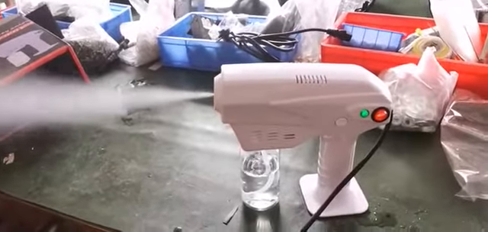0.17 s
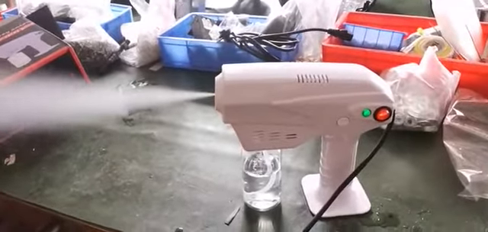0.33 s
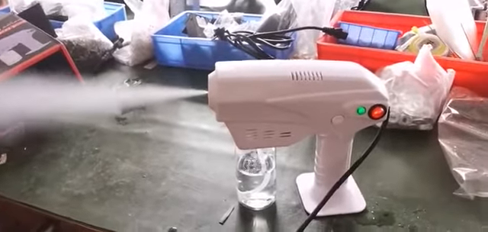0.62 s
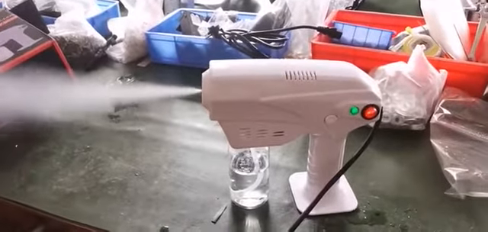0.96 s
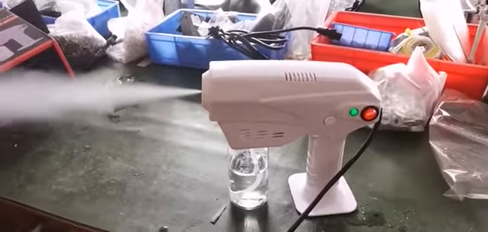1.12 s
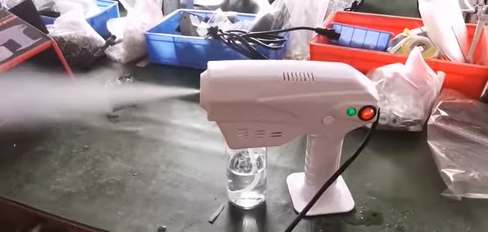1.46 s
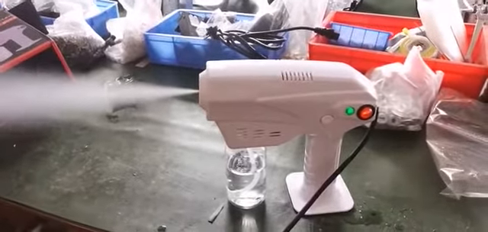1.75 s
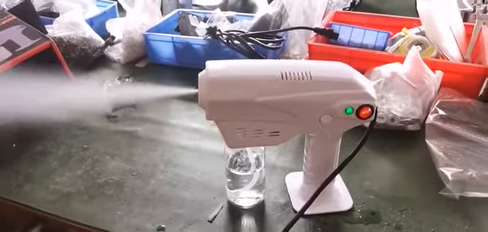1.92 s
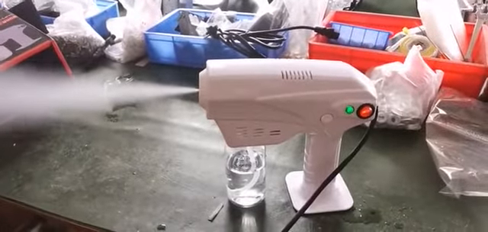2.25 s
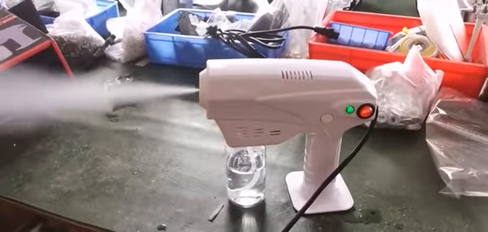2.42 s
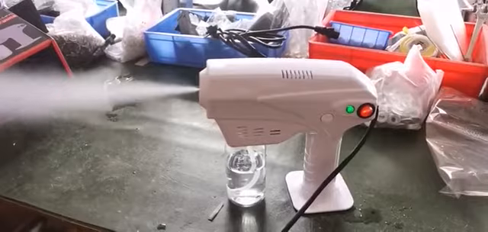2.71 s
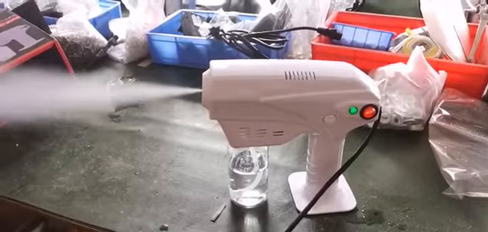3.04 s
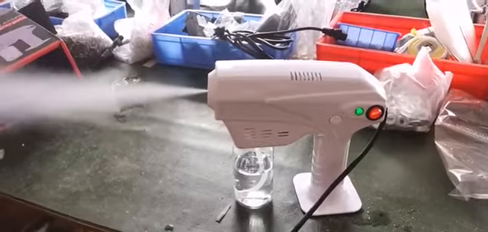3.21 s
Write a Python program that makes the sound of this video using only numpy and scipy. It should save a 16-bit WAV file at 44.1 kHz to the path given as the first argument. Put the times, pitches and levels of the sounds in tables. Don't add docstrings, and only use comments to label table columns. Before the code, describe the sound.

Mist hisses continuously from a spray gun, spitting slightly, with dragging, bumping and soft footsteps behind.

```python
import sys
import numpy as np
from scipy import signal
from scipy.fft import rfft, irfft
from scipy.io import wavfile
from scipy.ndimage import uniform_filter1d, minimum_filter1d

SR = 44100
rng = np.random.default_rng(int(sys.argv[2]) if len(sys.argv) > 2 else 0)


def master_out(mix):
    frames = np.transpose(np.atleast_2d(mix))
    ceiling = np.clip(frames, -1, 1)
    pcm = np.round(ceiling * 32767).astype(np.int16)
    wavfile.write(sys.argv[1], SR, pcm)


N = 148617
T = np.arange(N) / SR
F = np.maximum(np.fft.rfftfreq(N, 1 / SR), 1)

# (frequency [Hz], density [dB per Hz])
JET_COLOUR = [(290, -68), (500, -40.5), (780, -18), (1270, -25), (1630, -14.5), (1810, -13), (3630, -8.5),
              (5530, -3.5), (7600, 1.5), (9880, -39), (16700, -120)]
NOZZLE_HZ = [4320, 4640, 5020, 5385, 5760, 6100, 6580, 6960, 7200, 7420, 2600, 5200, 6320, 7530]
# (width [Hz], lift [dB])
NOZZLE_SHAPE = [(171, 5), (170, 5), (190, 8), (196, 9.5), (234, 10), (168, 3), (170, 2.5), (133, 0),
                (140, 2.5), (179, 4.5), (905, 2), (120, -1), (202, -1), (91.2, 1)]
# (time [s], level [dB])
FLOW = [(0, -45), (0.201, -43.5), (.45, -44.5), (.6, -43), (0.701, -43.5), (0.759, -46), (.95, -44),
        (1.05, -43.5), (1.22, -43.5), (1.349, -44.5), (1.701, -44), (2.4, -44), (2.6, -45), (2.731, -43.5),
        (2.82, -45), (3.0, -44.5), (3.2, -44), (3.37, -45)]
# (peak time [s], lift [dB])
SLUGS = [(0.063, 5.7), (0.194, 5.7), (0.593, 6.2), (0.792, 5.0), (0.826, 5.5), (1.014, 7.1), (1.09, 6.3),
         (1.213, 5.1), (1.468, 5.7), (1.532, 5.2), (1.588, 5.6), (1.691, 5.0), (1.72, 6.3), (1.774, 5.4),
         (1.944, 5.3), (2.037, 5.7), (2.101, 5.1), (2.378, 5.5), (2.438, 6.3), (2.532, 6.0), (2.679, 5.5),
         (2.705, 5.0), (2.919, 5.7), (3.0, 6.1), (3.026, 7.5), (3.096, 5.0), (3.149, 6.2), (3.223, 5.3),
         (3.297, 5.0)]
# (peak time [s], lift [dB])
SPITS = [(0.111, 4.5), (0.136, 4.7), (0.241, 3.7), (0.306, 4.9), (0.408, 4.3), (0.487, 3.7), (0.526, 3.7),
         (0.644, 4.7), (0.687, 4.2), (0.862, 4.4), (1.155, 4.5), (1.265, 4.1), (1.337, 3.8), (1.376, 4.5),
         (1.41, 4.5), (1.803, 4.6), (1.857, 4.8), (2.141, 4.3), (2.169, 4.9), (2.211, 4.4), (2.237, 4.7),
         (2.33, 3.7), (2.566, 3.8), (2.641, 3.9), (2.758, 4.1), (2.825, 3.9), (2.857, 4.3), (2.96, 4.4),
         (3.327, 4.8)]
# (time [s], lift [dB])
POPS = [(0.578, 4), (0.643, 4), (0.953, 3), (1.012, 3), (1.089, 6), (1.213, 3), (1.266, 3), (1.72, 5),
        (1.756, 4), (1.802, 4), (2.036, 3), (2.357, 4), (2.437, 3), (2.705, 3), (2.79, 3), (2.92, 4),
        (2.998, 7), (3.027, 3), (3.097, 5), (3.147, 2.5)]
# (frequency [Hz], share [1])
SPUTTER_SHARE = [(1000, 1.8), (2500, 0.31), (5000, 0.99), (7500, 0.12)]

# (time [s], scrape level [dB], boom level [dB])
DRAGS = [
    [(.1, -77, -71.5), (.2, -56, -54), (.3, -50, -57.5), (.42, -51.5, -60), (.55, -53, -53),
     (.7, -52.5, -63), (.8, -56, -60), (.88, -57.5, -60)],
    [(.97, -54.5, -64), (1.1, -51, -60.5), (1.26, -51, -55), (1.36, -51, -52.5), (1.42, -56.5, -56),
     (1.52, -62.5, -90)],
]
# (frequency [Hz], density [dB per Hz])
SCRAPE_COLOUR = [(150, -39), (250, -11.5), (276, -23), (346, -12.5), (892, -13.5), (1130, -9.5),
                 (1590, -10), (2080, -9), (3600, -10.5), (4680, -17), (7920, -120)]
# (centre [Hz], width [Hz], lift [dB])
SCRAPE_RING = [(1315, 98, 3.5), (1540, 90, 2), (2200, 530, 4.5), (350, 54, 3.5)]
# (time [s], peak level [dB], pitch [Hz])
BUMPS = [(0.051, -53, 111.6), (0.206, -53, 122.5), (0.255, -49, 120), (0.331, -43.5, 128), (0.39, -48, 124),
         (0.463, -47.5, 96.6), (0.491, -41.5, 108), (0.567, -38, 108), (0.631, -48, 96), (0.713, -45, 103),
         (0.8, -48, 95), (0.972, -47.5, 99), (1.031, -46, 104), (1.09, -46, 140), (1.139, -43, 100),
         (1.199, -44, 111), (1.249, -50, 116), (1.328, -36, 108), (1.795, -61, 152), (1.946, -53.5, 111),
         (1.995, -44, 102.3), (2.039, -51.5, 155), (2.081, -56, 187)]
# (ratio to pitch [1], level [dB], 60 dB decay time [s])
BUMP_MODES = [(1.001, -3.5, 0.13), (1.24, -12.5, 0.15), (2.3, -17, .08), (3.4, -15, 0.082)]
# (time [s], centre [Hz])
SQUEAL_PITCH = [(0.2, 2280), (0.3, 2200), (0.36, 2255), (0.45, 2120), (0.55, 2083), (0.72, 2164),
                (0.78, 2227), (0.826, 2072), (1.1, 2008), (1.18, 2047), (1.23, 2130), (1.29, 2200),
                (1.33, 2083), (1.42, 2140), (1.5, 2200)]
# (time [s], lift [dB])
BITES = [
    (.3, 3),
    (.33, 4.5),
    (.46, 10.5),
    (1.124, 7),
    (1.18, 8.5),
    (1.225, 3.5),
    (1.28, 3.5),
    (1.325, 1),
]

# (peak time [s], level [dB], rise [s], fall [s])
STEPS = [
    (2.66, -63, 0.042, 0.027),
    (2.7, -53, 0.025, 0.047),
    (2.755, -57.5, 0.024, 0.028),
    (2.935, -58.5, .025, 0.015),
    (2.99, -58, 0.015, 0.053),
    (3.1, -64, 0.017, 0.018),
    (3.19, -58, 0.03, 0.045),
    (3.26, -58.5, .04, .05),
    (3.31, -51.5, 0.036, 0.044),
    (3.355, -50, .03, 0.11),
]
# (frequency [Hz], density [dB per Hz])
STEP_COLOUR = [(24, -46.5), (40, -3.5), (230, 1.5), (348, 1), (456, -2.5), (589, -14), (783, -14),
               (890, -8.5), (1200, -22.5), (1560, -41), (2640, -120)]
# (frequency [Hz], density [dB per Hz])
SHOP_COLOUR = [(12, -38), (20, -4), (43, -2.5), (75, -3.5), (146, 1), (317, -5), (380, -3), (576, -6.5),
               (1500, -6.5), (1950, -41), (3300, -120)]
# (time [s], level [dB])
SHOP_SWELL = [(0, 0), (.18, -1.5), (.3, 1), (1.4, 0.5), (1.55, -0.5), (1.75, 0), (2.2, 0), (2.9, 1),
              (3.37, 0.5)]

# (frequency [Hz], threshold [dB])
DROPOUT = [(1200, -8), (1900, -4.5), (2600, -4.8), (3000, -2.5), (3450, -1.1), (3950, -1.6), (4250, -7),
           (7600, -11)]
# (time [s], low edge [Hz], high edge [Hz])
FILLS = [(.265, 5150, 6900), (.36, 6900, 7580), (1.333, 4650, 5150), (1.498, 6250, 6900),
         (1.662, 4150, 4650), (1.848, 6900, 7580), (2.355, 4650, 5150), (2.82, 5650, 6900),
         (3.077, 4150, 4650), (3.1, 6250, 6900), (3.147, 4650, 5150), (3.193, 5150, 5650)]


def undb(db):
    return 10 ** (np.asarray(db) / 20)


def unit(x):
    return x / np.sqrt(np.mean(x ** 2))


def follow(table):
    return np.interp(T, *np.array(table).T)


def colour(points, peaks=()):
    hz, db = np.array(points, float).T
    db = np.interp(np.log(F), np.log(hz), db, left=-60, right=-60)
    lift = sum(g / (1 + (2 * (F - centre) / width) ** 2) for centre, width, g in peaks)
    return undb(db + lift)


def hiss(gain):
    return irfft(rfft(rng.standard_normal(N)) * gain, N)


def walk(rate_hz):
    hold = max(int(SR / rate_hz), 1)
    levels = rng.standard_normal(N)[np.arange(N) // hold]
    return unit(uniform_filter1d(uniform_filter1d(levels, hold), hold))


def flutter(rate_hz):
    w = walk(rate_hz)
    return w - uniform_filter1d(w, SR // 8)


def hump(at, rise, fall):
    d = T - at
    return np.where(d < 0, np.exp(-(d / rise) ** 2), np.exp(-np.maximum(d, 0) / fall))


def sputter():
    slugs = sum(hump(s, 0.008, 0.010) * 0.95 * db for s, db in list(SLUGS) + list(SPITS))
    pops = sum(hump(s, 0.0015, 0.0025) * 1.1 * db for s, db in POPS)
    slugs = slugs - uniform_filter1d(slugs, SR // 5)
    return pops + slugs + 0.4 * flutter(90) + 1.7 * walk(401)


def jet():
    flicker_hz, flicker_db, trim_db = 40, 1.2, 1
    swell = sputter()
    peaks = [(hz, max(width, 90), db) for hz, (width, db) in zip(NOZZLE_HZ, NOZZLE_SHAPE)]
    gain = colour(JET_COLOUR, peaks)
    out = 0
    for hz in 8000 * 2 ** -np.arange(0, 4.5, 1 / 3):
        band = np.cos(np.pi / 2 * np.clip(3 * np.log2(F / hz), -1, 1))
        share = np.interp(hz, *np.array(SPUTTER_SHARE).T)
        out = out + hiss(gain * band) * undb(share * swell + flicker_db * flutter(flicker_hz))
    return unit(out) * undb(follow(FLOW) + trim_db)


def drag_effort(column):
    d = np.vstack(DRAGS)
    return undb(np.interp(T, d[:, 0], d[:, column], left=-99, right=-99))


def crate():
    push = np.sqrt(np.maximum(drag_effort(1) ** 2 - undb(-63.5) ** 2, 0))
    return scrape() * push + squeal() * push ** 2 / push.max() + boom() * drag_effort(2) + bumps()


def scrape():
    grit_hz, grit_db, trim_db = 90.3, 2, 1
    noise = hiss(colour(SCRAPE_COLOUR, SCRAPE_RING))
    return unit(noise * undb(grit_db * flutter(grit_hz))) * undb(trim_db)


def squeal():
    width_hz, flutter_hz, flutter_db, bite_s, level_db = 280, 25.8, 2.5, 0.011, -4.5
    low = 1 / (1 + (2 * F / width_hz) ** 2)
    turn = 2 * np.pi * np.cumsum(follow(SQUEAL_PITCH)) / SR
    noise = hiss(low) * np.cos(turn) + hiss(low) * np.sin(turn)
    flare = sum(db * hump(s, bite_s, bite_s) for s, db in BITES)
    return unit(noise * undb(flutter_db * walk(flutter_hz) + flare)) * undb(level_db)


def boom():
    centre_hz, width_hz, trim_db = 110, 48, -4.5
    return unit(hiss(1 / (1 + (2 * (F - centre_hz) / width_hz) ** 2))) * undb(trim_db)


def bumps():
    rise_s, trim_db = 0.01, 5
    detune = 1 + 0.012 * rng.standard_normal((len(BUMPS), len(BUMP_MODES)))
    out = 0
    for (s, db, hz), tune in zip(BUMPS, detune):
        age = np.maximum(T - s, 0)
        rise = 1 - np.exp(-age / rise_s)
        for (ratio, g, t60), j in zip(BUMP_MODES, tune):
            decay = undb(db + g + trim_db - 60 * age / t60)
            out = out + decay * rise * np.sin(2 * np.pi * hz * ratio * j * age)
    return out


def steps():
    power = sum((undb(db) * hump(s, rise, fall)) ** 2 for s, db, rise, fall in STEPS)
    return unit(hiss(colour(STEP_COLOUR)) * undb(1.8 * walk(60))) * np.sqrt(power)


def shop():
    murmur = unit(hiss(colour(SHOP_COLOUR)) * undb(1.8 * flutter(20)))
    return murmur * undb(-63 + follow(SHOP_SWELL))


def scene():
    mid = jet() + crate() + steps() + shop()
    return np.array([mid, mid])


def dropouts(x):
    f, _, z = signal.stft(x, SR, "hann", 2048, 1536)
    band = np.arange(len(f)) // 4
    power = np.add.reduceat(np.abs(z) ** 2, np.arange(0, len(f), 4))
    power = uniform_filter1d(power, size=5, axis=1)
    wide = np.abs(uniform_filter1d(power, size=9, axis=0))
    usual = np.median(wide, axis=1)[:, None] ** .15 * wide ** .85
    threshold_db = np.interp(f[::4], *np.array(DROPOUT).T, left=-60)
    edge = usual * undb(2 * threshold_db)[:, None]
    keep = minimum_filter1d(1. * (power > edge), size=3, axis=1).clip(.04)
    return signal.istft(z * keep[band], SR, "hann", 2048, 1536)[1][:N]


def stereo_fills(mid):
    fill_s, level_db = 2048 / 44100, -6
    noise = hiss(np.sqrt(np.abs(uniform_filter1d(np.abs(rfft(mid)) ** 2, size=900)) / N))
    spectrum = rfft(noise)
    side = 0
    for s, low, high in FILLS:
        window = np.cos(np.pi * np.clip((T - s) / fill_s, -.5, .5))
        side = side + irfft(spectrum * (F > low) * (F < high), N) * window
    return side * undb(level_db)


def top_cut(x):
    return signal.sosfilt(signal.butter(12, 8730, fs=SR, output="sos"), x)


def record(dry):
    top_hz, slope_db_per_hz = 7575, -.44
    cut = undb(slope_db_per_hz * np.maximum(F - top_hz, 0))
    mid = irfft(rfft(dropouts(dry[0])) * cut, N)
    side = stereo_fills(mid)
    mix = np.array([mid + side, mid - side])
    return top_cut(mix)


dry = scene()
out = record(dry)
master_out(out)
```